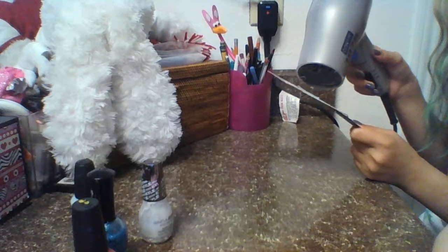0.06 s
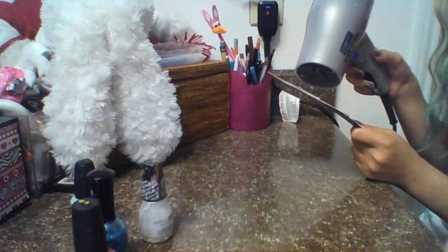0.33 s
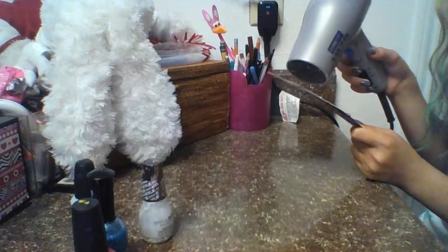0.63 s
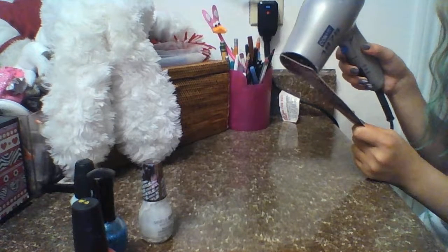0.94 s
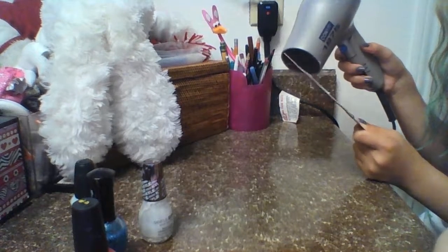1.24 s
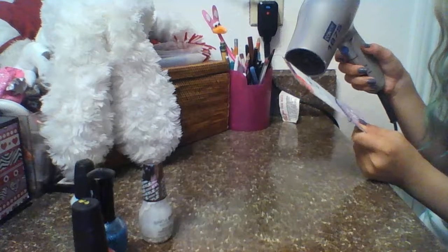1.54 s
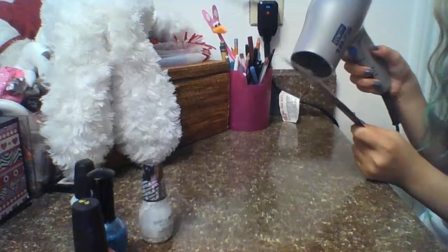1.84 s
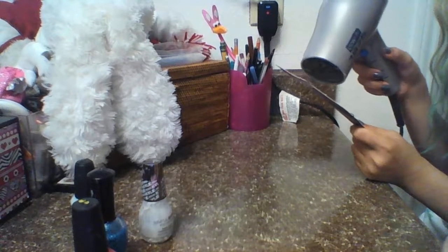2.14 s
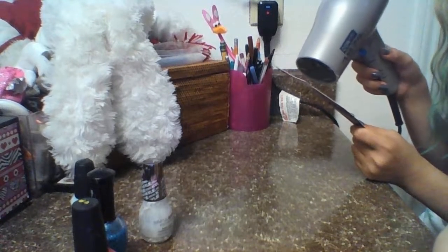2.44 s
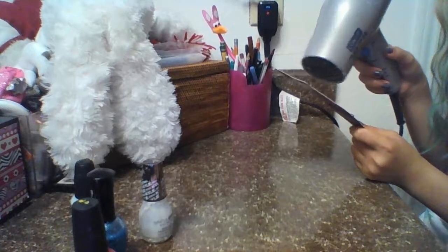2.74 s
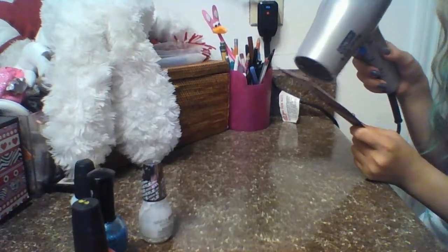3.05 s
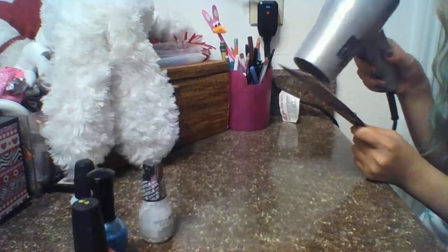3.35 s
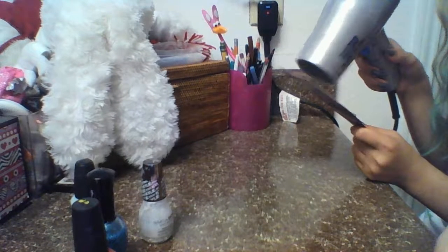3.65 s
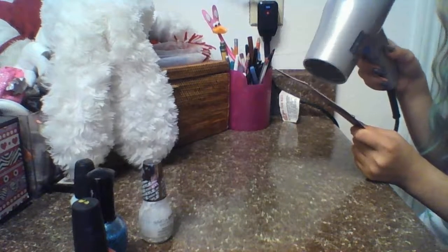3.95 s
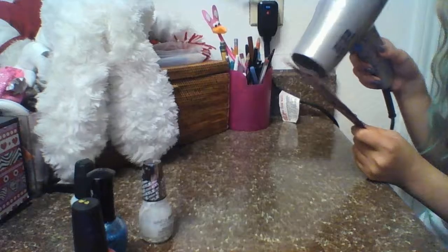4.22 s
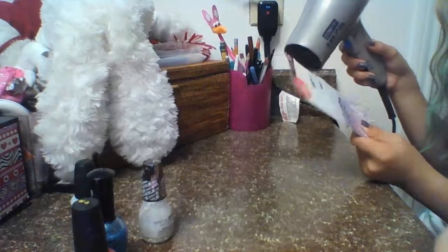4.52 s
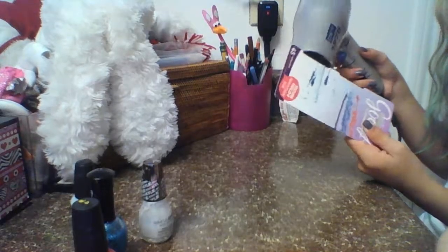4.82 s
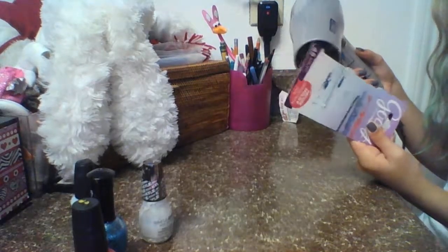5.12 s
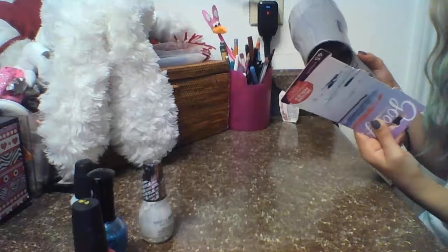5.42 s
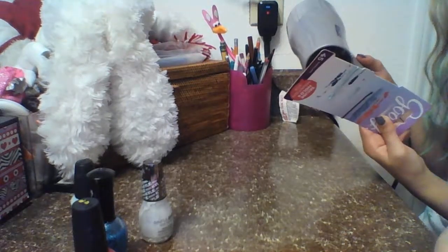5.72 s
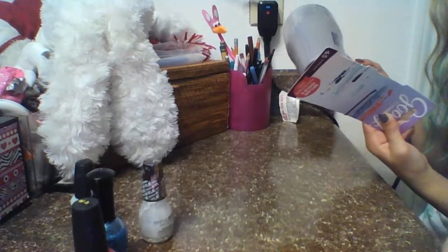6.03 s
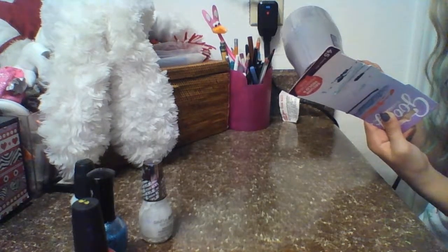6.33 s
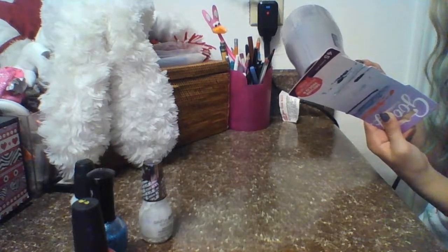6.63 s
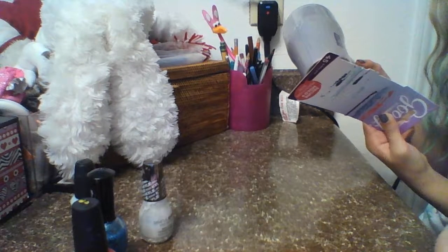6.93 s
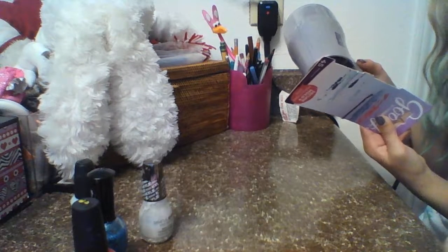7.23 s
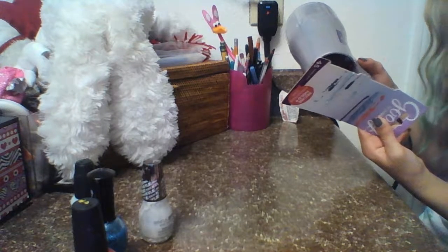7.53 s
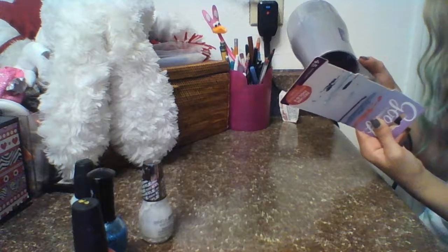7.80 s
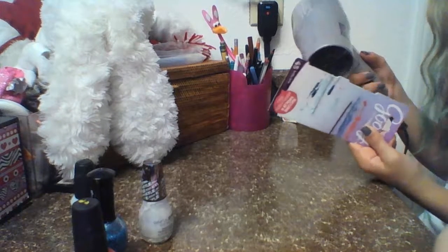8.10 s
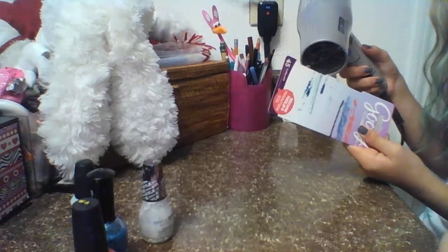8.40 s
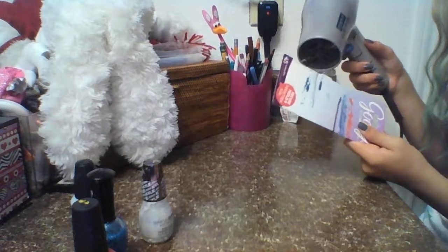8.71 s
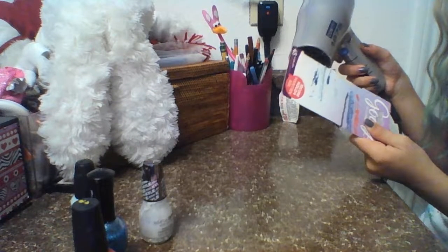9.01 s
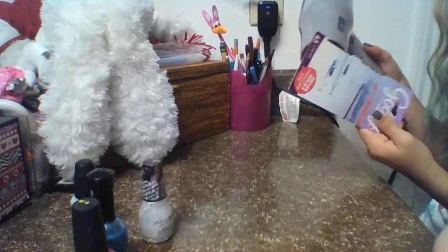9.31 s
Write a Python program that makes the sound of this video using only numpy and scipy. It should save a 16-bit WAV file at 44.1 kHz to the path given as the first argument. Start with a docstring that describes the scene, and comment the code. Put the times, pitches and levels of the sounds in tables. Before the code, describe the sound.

Steady hair dryer rush with a thin fan whine, airy whistles against a card, and occasional wind thumps on the microphone.

```python
"""A steady rush of air from a handheld hair dryer, blowing on a card over a table in a small room.
Turbulence rings the housing, with the thin whine of the fan underneath. The jet hisses and whistles
on the card's edge, and the nozzle sings as the card cuts across its mouth. Now and then the card
turns the stream onto the microphone, which rumbles and thumps."""
import sys
import numpy as np
from scipy import signal
from scipy.fft import rfft, irfft
from scipy.io import wavfile
from scipy.ndimage import uniform_filter1d, map_coordinates

SR = 44100
rng = np.random.default_rng(int(sys.argv[2]) if len(sys.argv) > 2 else 0)


def persist_wave(psi):
    """Save psi, clipped to +-1, as 16-bit WAV."""
    counts = np.round(np.clip(psi, -1, 1) * 32767).astype(np.int16)
    wavfile.write(sys.argv[1], SR, np.atleast_2d(counts).T)


N = 417186
T = np.arange(N) / SR
HZ = np.fft.rfftfreq(N, 1 / SR)

# the fan's nearly steady blade tone: time_s, pitch_hz
BLADE_PITCH = [(0, 3630), (.8, 3630), (1.6, 3619), (2.4, 3633), (3, 3630), (4.2, 3638), (5.3, 3624),
               (6, 3630), (6.5, 3640), (7.1, 3638), (8, 3646), (9.46, 3626)]
# the blade tone comes forward as the nozzle turns toward the microphone: time_s, level_db
BLADE_LEVEL = [(0, -55.5), (4.5, -54.5), (5.03, -50), (5.12, -44), (5.32, -40.5), (5.62, -66), (5.94, -58),
               (6.01, -41.5), (6.32, -39.3), (6.85, -42), (6.95, -37.5), (7.05, -44), (7.2, -42.5),
               (7.7, -62), (8.9, -54), (9.02, -44), (9.3, -41.5), (9.46, -45)]
# faint motor tones: shaft_multiple, level_db
MOTOR_TONES = [(2, -64), (5, -66), (7, -56.5), (12, -61), (28, -67)]

# the card turns the stream onto the microphone: start_s, hold_s, level_db
MIC_GUSTS = [(-.02, 0.055, -34.5), (.08, 0.087, -40.5), (.165, 0.016, -31), (.205, 0.02, -34),
             (.335, 0.12, -36.5), (.475, 0.027, -35), (.52, 0.02, -39), (.57, .015, -47), (.625, 0.03, -39),
             (.775, 0.016, -51), (1.19, 0.065, -45), (1.26, 0.028, -35), (1.32, 0.11, -45),
             (1.455, 0.013, -33.5), (1.51, 0.035, -38.5), (1.59, 0.11, -44), (1.735, 0.036, -32.5),
             (1.805, 0.02, -34), (1.85, .015, -38), (1.89, 0.042, -43), (2.3, 0.098, -45.5),
             (2.45, .1, -36), (3.705, 0.025, -45), (4.56, 0.07, -41.5), (5.12, 0.068, -38),
             (5.31, 0.016, -46), (5.89, 0.086, -44), (8.147, .03, -35), (8.172, 0.123, -25.2),
             (8.315, 0.015, -28), (8.365, 0.012, -29.5), (8.398, 0.063, -33), (8.488, 0.035, -28.5),
             (8.55, 0.04, -25.5), (8.6, 0.035, -32), (8.675, .012, -35), (8.73, 0.032, -29),
             (8.775, 0.017, -27.5), (8.815, 0.042, -35.5), (8.89, .07, -42.5), (9.215, 0.041, -37),
             (9.28, .04, -40.5), (9.362, 0.024, -31.5), (9.415, 0.018, -33.5)]
# tone colour of the wind rumble: frequency_hz, relative_db
RUMBLE_SPECTRUM = [(25, -46), (55, -37), (90, -27), (110, -.5), (145, 2), (180, -2), (240, -12), (330, -25),
                   (500, -30), (1200, -63.5)]
# the strongest eddies thump: peak_s, level_db, pitch_hz
EDDY_THUMPS = [(1.765, -24, 130), (1.817, -24, 150), (2.473, -23, 146), (4.578, -19.5, 133),
               (8.186, -15.5, 165), (8.255, -9.5, 193), (8.281, -13, 220), (8.562, -14, 132),
               (8.748, -18, 149)]

# the low rush swells now and then with a hollow note: peak_s, length_s, level_db
HOLLOW_SWELLS = [(0.948, 0.35, -53.5), (2.7, 1.3, -55), (3.35, 0.61, -49.5), (4.3, 0.62, -51.5),
                 (5.62, 0.58, -49), (6.08, 0.12, -44.5), (6.55, 1.04, -51.5)]
# resonances of that hollow note: pitch_hz, width_hz, relative_db
HOLLOW_MODES = [(258, 75, 0), (366, 60, 0.5), (448, 89, -3)]
# the jet grazes the card edge-on and sizzles: peak_s, length_s, level_db
SIZZLE_SWELLS = [(1.2, 0.77, -46.5), (1.72, 1, -47), (4.4, 0.61, -48.5), (4.66, 0.29, -45.5)]
# tones of the card's edge: pitch_hz, width_hz, relative_db
SIZZLE_MODES = [(3300, 86, -1), (4085, 230, -1.5), (4610, 130, -8), (5700, 260, -3.5), (6630, 900, -1)]
# a climbing hiss as the card first tips into the jet: peak_s, length_s, level_db
TIPPING_SWELL = [(.78, 0.87, -47)]
# brief airy whistles: peak_s, length_s, pitch_hz, width_hz, level_db
EDGE_WHISTLES = [(0.879, 0.091, 2300, 60, -44), (1.39, 0.15, 2330, 70, -46), (1.523, .06, 3330, 50, -40),
                 (1.56, 0.28, 4490, 90, -45.5), (1.77, .09, 4050, 130, -40), (1.803, .15, 3170, 198, -38.5),
                 (1.943, .07, 3230, 60, -39), (2.721, 0.24, 5400, 400, -42.5),
                 (4.302, 0.35, 5620, 420, -46), (4.41, 0.19, 3380, 120, -40), (4.494, 0.066, 3290, 50, -42),
                 (4.578, 0.14, 1420, 140, -41.5), (4.575, 0.28, 6650, 250, -45),
                 (4.714, 0.21, 3310, 70, -42.5), (4.734, 0.25, 4100, 150, -43.5),
                 (4.93, 0.19, 3510, 70, -42), (5.134, 0.17, 3400, 80, -45), (5.257, .14, 5160, 200, -40),
                 (5.22, 0.22, 6120, 250, -44), (5.435, .12, 2280, 50, -38.5),
                 (5.423, 0.17, 2590, 90.5, -38), (5.424, 0.7, 7380, 272, -53),
                 (5.725, 0.43, 4920, 220, -47), (6.15, .2, 4250, 90, -45), (8.28, .3, 5430, 230, -41.5),
                 (8.307, 0.13, 3470, 109.7, -40.5), (8.577, 0.1, 3470, 95, -31.5),
                 (8.605, 0.41, 6200, 400, -42.5)]

# the card cuts across the mouth and the nozzle rings: peak_s, length_s, level_db
CARD_CUTS = [(.15, 0.8, -44.5), (1.45, 1.05, -46), (2.35, 0.63, -50.5), (4.77, 0.42, -41.5),
             (5.08, 0.26, -39), (5.237, 0.084, -28.5), (5.29, .14, -35.5), (5.44, 0.298, -32.5),
             (5.6, 0.203, -39.5), (8.3, 0.17, -30.5), (8.55, 0.13, -32.5), (8.625, 0.16, -32),
             (8.75, 0.27, -42), (8.9, 2.5, -46)]
# the nozzle's weaker resonances: pitch_hz, width_hz, relative_db
NOZZLE_SIDE_MODES = [(1243, 120, -13), (2194, 150, -18.5), (2520, 110, -7.5), (3024, 29, -19),
                     (5230, 130, -19.5), (5920, 230, -21)]

# strength of the jet at the microphone as dryer and card move: time_s, level_db
JET_STRENGTH = [(0, -40), (.95, -39.5), (1.8, -40), (2.4, -39.5), (3.9, -41), (4.45, -40), (4.65, -37.5),
                (4.87, -39), (5.42, -36), (5.72, -38), (6.2, -37.5), (7.3, -39), (7.6, -38), (8.12, -39),
                (8.3, -36.5), (8.62, -35.5), (8.95, -39), (9.46, -37.5)]
# tone colour of the rush in the housing: frequency_hz, relative_db
RUSH_SPECTRUM = [(30, -20), (100, -10), (170, -4.5), (260, 0.5), (370, -7.5), (470, -5), (560, -0.8),
                 (670, -2.3), (770, -10.5), (880, -2), (1120, -7.5), (1280, -8), (1500, -8), (2000, -12),
                 (4000, -14.5)]
# tone colour of the jet: frequency_hz, relative_db
JET_SPECTRUM = [(300, -27), (1200, -12.5), (1750, -11), (2050, 1), (2450, 1.5), (2850, 0), (3200, -1),
                (3800, -5.5), (4200, -3.5), (4600, -9), (5200, -4), (5900, -6.5), (6400, -5.5),
                (7200, -13.5), (7800, -20.5)]
# resonances and notches of the housing: centre_hz, width_hz, lift_db
HOUSING_EQ = [(368, 45, 11.5), (443, 43, 8), (954, 91, 9), (1052, 28, 4), (1097, 40, -3.5), (1200, 34, 6.5),
              (1285, 9.8, 6.5), (1320, 18, 1.5), (1555, 50, -6.5), (1635, 64, 3.5), (2000, 74, 4.5),
              (2036, 56, -4.5), (2290, 42, -4), (2870, 90, -2.5), (2980, 40, -5.5), (3136, 57, -3),
              (3480, 36, 3), (4975, 230, 5)]
# the housing's note near 950 Hz comes and goes with the dryer's angle: time_s, lift_db
DUCT_NOTE_LIFT = [(0, 3), (.35, 1.5), (1.3, -4), (2.25, 4), (3, 2), (3.8, 4), (4.85, -1.2), (5.4, 0),
                  (5.85, -3), (6.5, -0.5), (8.6, 0.2), (9.1, -1.5)]


def amp(db):
    """Decibels to gain."""
    return 10 ** (np.asarray(db) / 20)


def unit_rms(x):
    """Scales to rms 1."""
    return x / np.sqrt(np.mean(x ** 2) + 1e-20)


def curve(rows):
    """An automation line through (time_s, value) points."""
    return np.interp(T, *np.transpose(rows))


def spectrum_db(points):
    """An EQ curve through (frequency_hz, level_db) points on a log-frequency axis."""
    hz, db = np.transpose(points)
    return np.interp(np.log(HZ + 1), np.log(hz + 1), db)


def above(hz, order=8):
    """Share of the power that a soft high-pass lets through at each frequency."""
    return 1 / (1 + (hz / (HZ + 1)) ** order)


def noise(gain):
    """Noise of rms 1, shaped by a gain at each frequency."""
    return unit_rms(irfft(rfft(rng.standard_normal(N)) * gain, N))


def drift(rate_hz):
    """Smooth random modulation of rms 1, mostly slower than rate_hz."""
    steps = T[::32]
    hz = np.fft.rfftfreq(len(steps), steps[1])
    spectrum = rfft(rng.standard_normal(len(steps))) / (1 + (hz / rate_hz) ** 2)
    return np.interp(T, steps, unit_rms(irfft(spectrum, len(steps))))


def steadied(x, amount):
    """Evens out the swings of a noise, as in a flow that half sustains its own oscillation."""
    envelope = abs(signal.hilbert(x))
    return unit_rms(x / (envelope + 0.22) ** amount)


def glide(x, shift_hz):
    """Slides all the frequencies of a sound up or down along a curve."""
    return (signal.hilbert(x) * np.exp(2j * np.pi * np.cumsum(shift_hz) / SR)).real


def swells(rows):
    """Gain envelope of rounded swells."""
    gains = (amp(db) * np.cos(np.pi * np.clip((T - peak_s) / length_s, -.5, .5))
             for peak_s, length_s, db in rows)
    return np.sqrt(sum(gain ** 2 for gain in gains))


def bursts_db(rows, rise_s, fall_s, rest_db):
    """Level envelope of bursts that rise, hold and die away above a resting level."""
    power = np.full(N, amp(2 * rest_db))
    for start_s, hold_s, db in rows:
        attack = np.clip((T - start_s) / rise_s, 0, 1)
        release = np.exp(-np.clip((T - start_s - hold_s) / fall_s, 0, 20))
        power += (amp(db) * attack * release) ** 2
    return 10 * np.log10(power)


def airy_tone(hz, width_hz, size=N):
    """Turbulence ringing one narrow resonance, rms 1."""
    x = rng.standard_normal(size + SR // 4)
    for spread in (.7, 1.4):
        x = signal.lfilter(*signal.iirpeak(hz, hz / (spread * width_hz), fs=SR), x)
    return unit_rms(x[-size:])


def airy_chord(modes, sway_db=0):
    """Turbulence ringing several resonances, each swaying on its own by sway_db."""
    return sum(amp(db + sway_db * drift(6.7)) * airy_tone(hz, width_hz) for hz, width_hz, db in modes)


def room(x, wet_db=-10, t60_s=0.12, positions=15):
    """The table and near walls add early echoes whose colour shifts as the dryer moves."""
    t = np.arange(SR // 8) / SR
    decay = amp(-60 * t / t60_s) * (t > .002)
    travel = T / T[-1] * (positions - 1)
    echoes = np.zeros(N)
    for position in range(positions):
        taps = rng.standard_normal(len(t)) * (rng.random(len(t)) < 2000 / SR) * decay
        crossfade = np.cos(np.pi / 2 * np.clip(travel - position, -1, 1))
        echoes += signal.oaconvolve(x * crossfade, taps / np.linalg.norm(taps))[:N]
    return (x + amp(wet_db) * echoes) / np.sqrt(1 + amp(2 * wet_db))


def fan_whine(blades=14):
    """A thin blade tone over fainter motor tones, all wavering with the shaft's speed."""
    shaft_hz = curve(BLADE_PITCH) / blades * (1 + 0.0013 * drift(27))
    angle = 2 * np.pi * np.cumsum(shaft_hz) / SR
    waver_db = 2.0 * drift(30) + 1.6 * drift(150)
    whine = amp(curve(BLADE_LEVEL) + waver_db) * np.sin(blades * angle)
    motor = sum(amp(db + 2.8 * drift(14)) * np.sin(multiple * angle) for multiple, db in MOTOR_TONES)
    return np.sqrt(2) * (whine + motor)


def mic_buffeting():
    """Deflected air beats on the microphone in sputtering gusts and thumping eddies."""
    sputter_db = 3.8 * np.tanh(drift(45))
    gust_db = bursts_db(MIC_GUSTS, rise_s=0.0074, fall_s=0.023, rest_db=-60) + sputter_db
    gate = 1 / (1 + amp(2 * (-57 - gust_db)))  # ducks the rumble between gusts
    rumble = steadied(noise(amp(spectrum_db(RUMBLE_SPECTRUM))), 0.28) * amp(gust_db) * gate
    # a faster stream sheds smaller, higher eddies
    flutter_band = 1 / (1 + ((HZ - 265) / 100) ** 4)
    flutter = steadied(noise(flutter_band), 1.0) * amp(1.85 * gust_db + 16)
    wind = rumble + flutter
    for peak_s, db, hz in EDDY_THUMPS:
        half_length_s = 2.24 / hz
        near = abs(T - peak_s) < half_length_s
        t = T[near] - peak_s
        envelope = np.cos(np.pi * t / half_length_s / 2) ** 4
        wind[near] += amp(db) * envelope * np.cos(2 * np.pi * hz * t)
    # the microphone passes little of the deepest pressure swings
    return irfft(rfft(wind) * np.sqrt(above(97, order=7)), N)


def edge_tones(hollow_sway_hz=16, climb_hz_per_s=1150):
    """The jet splits on the card and rings narrow, breathy resonances that flicker with its eddies."""
    hollow = glide(airy_chord(HOLLOW_MODES, sway_db=3), hollow_sway_hz * drift(3))
    sizzle = airy_chord(SIZZLE_MODES, sway_db=1.5)
    climb_hz = climb_hz_per_s * (T - TIPPING_SWELL[0][0])
    climbing_hiss = glide(airy_tone(hz=5500, width_hz=260), climb_hz)
    tones = swells(HOLLOW_SWELLS) * hollow + swells(SIZZLE_SWELLS) * sizzle
    tones += swells(TIPPING_SWELL) * climbing_hiss
    for peak_s, length_s, hz, width_hz, db in EDGE_WHISTLES:
        near = abs(T - peak_s) < length_s / 2
        whistle = airy_tone(hz, width_hz, size=SR)[:near.sum()]
        tones[near] += amp(db) * np.cos(np.pi * (T[near] - peak_s) / length_s) * whistle
    flicker = unit_rms(amp(2.2 * drift(20)))
    return flicker * tones


def nozzle_song(idle_db=-53.5, bend_hz=56, half_bend_db=-36, waver_hz=14):
    """The nozzle sings one note, louder and a touch higher as the card cuts in; weaker modes join it."""
    cut = swells(CARD_CUTS)
    shift_hz = bend_hz * cut / (cut + amp(half_bend_db)) + waver_hz * drift(11.96)
    note = steadied(airy_tone(hz=2570, width_hz=34), 0.85)
    lead = np.hypot(cut, amp(idle_db)) * glide(note, shift_hz)
    side_modes = cut * airy_chord(NOZZLE_SIDE_MODES)
    flicker = unit_rms(amp(1.9 * drift(35)))
    return flicker * (lead + side_modes)


def card_echo(x, echo_db=-15, mean_delay_s=.0018, sway=.13):
    """The card throws the treble back after a short, shifting delay: a gentle, hollow flanging."""
    delay_s = mean_delay_s * (1 + sway * drift(0.93))
    treble = irfft(rfft(x) * above(2100), N)
    return x + amp(echo_db) * map_coordinates(treble, [(T - delay_s) * SR], order=3)


def jet_flapping(x, depth_db=1.77):
    """The jet flaps from side to side, so patches of its colour brighten and dim."""
    framing = dict(fs=SR, nperseg=512, noverlap=384)
    hz, _, frames = signal.stft(x, **framing)
    patches = rng.standard_normal(frames.shape)
    for axis, cells in [(0, 3), (0, 4), (1, 24), (1, 36)]:  # blur over frequency, then time
        patches = uniform_filter1d(patches, cells, axis)
    reach = np.interp(hz, [1100, 2200], [.3, 1])[:, None]  # the housing's low notes hold steadier
    frames *= amp(depth_db * reach * unit_rms(patches))
    return signal.istft(frames, **framing)[1][:N]


def air_rush(usual_flow_db=-39):
    """Turbulence in housing and jet, coloured by the housing's resonances; five bands ride the flow."""
    housing_db = sum(db / (1 + (2 * (HZ - hz) / width_hz) ** 2) for hz, width_hz, db in HOUSING_EQ)
    duct, mids, hiss = (above(hz, order=16) for hz in (707, 1148, 1980))
    spray = above(4480)
    flow_db = curve(JET_STRENGTH) - usual_flow_db

    def band(spectrum, share, usual_db, follow):
        """One band of the rush; it gains `follow` dB for each dB of flow."""
        level_db = usual_db + follow * flow_db + .5 * drift(32)
        return noise(amp(spectrum_db(spectrum) + housing_db) * np.sqrt(share)) * amp(level_db)

    return (band(RUSH_SPECTRUM, duct * (1 - mids), usual_db=-45 + curve(DUCT_NOTE_LIFT), follow=0.83)
            + band(RUSH_SPECTRUM, mids * (1 - hiss), usual_db=-46.5, follow=0.35)
            + band(JET_SPECTRUM, hiss * (1 - spray), usual_db=-39.5, follow=1)
            + band(JET_SPECTRUM, spray, usual_db=-43, follow=0.57)
            + band(RUSH_SPECTRUM, 1 - duct, usual_db=-49, follow=0.19))  # low roar


def scene():
    """The rush with its echoes, plus dry whine, whistles and wind; the same mix on both channels."""
    air = room(card_echo(jet_flapping(air_rush())))
    mono = air + fan_whine() + nozzle_song() + edge_tones() + mic_buffeting()
    return np.array([mono, mono])


def record(dry):
    """A small microphone whose treble falls away quickly, then a steep high cut at 9100 Hz."""
    treble_db = np.interp(HZ, [7600, 8100, 8900], [0, -10, -17])
    coloured = irfft(rfft(dry) * amp(treble_db), N)
    high_cut = signal.firwin(511, 9100, window=("kaiser", 9), fs=SR)
    return signal.oaconvolve(coloured, high_cut[None], "same")


dry = scene()
out = record(dry)
persist_wave(out)
```